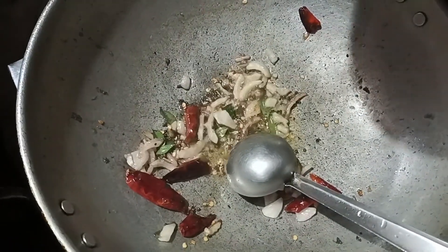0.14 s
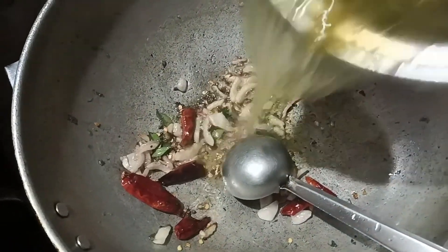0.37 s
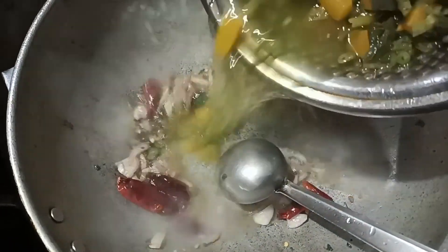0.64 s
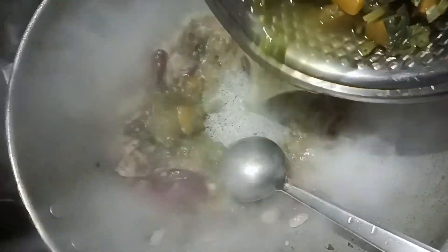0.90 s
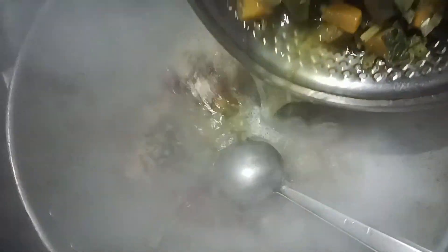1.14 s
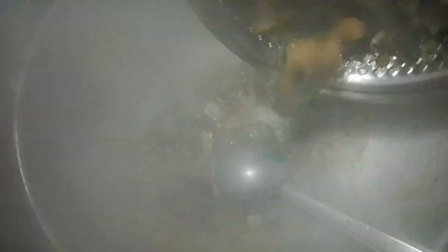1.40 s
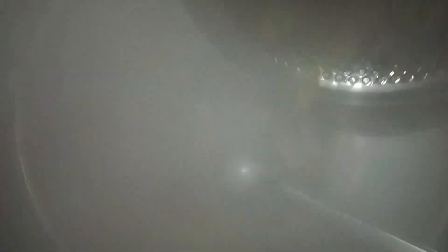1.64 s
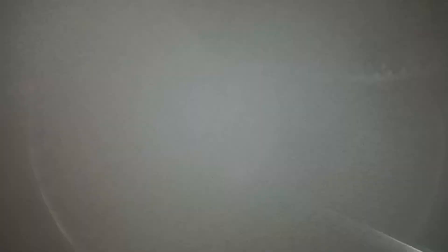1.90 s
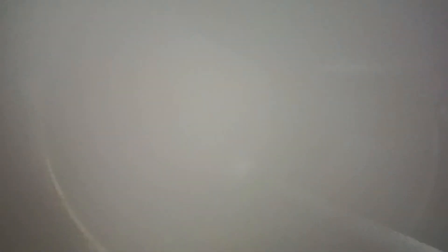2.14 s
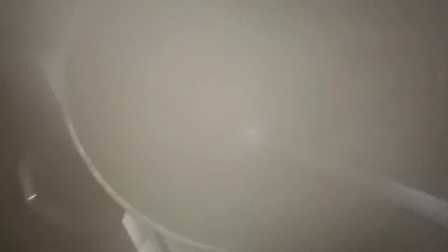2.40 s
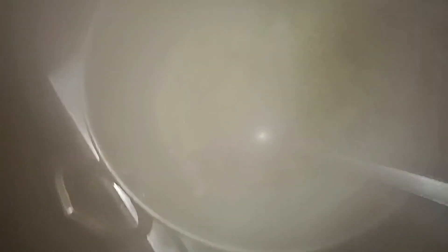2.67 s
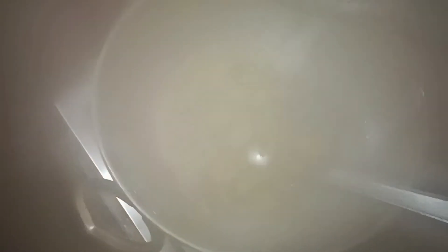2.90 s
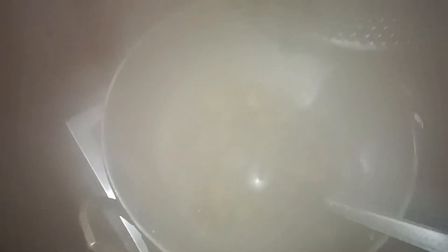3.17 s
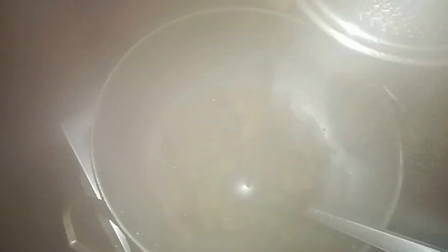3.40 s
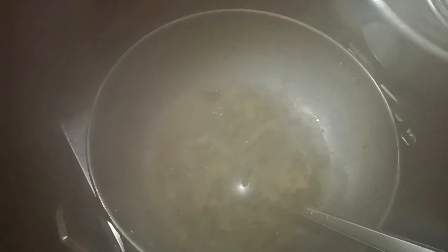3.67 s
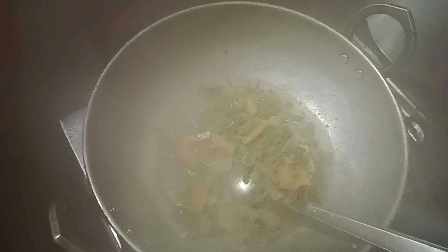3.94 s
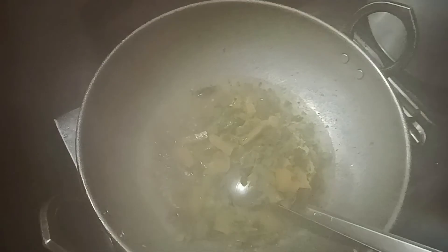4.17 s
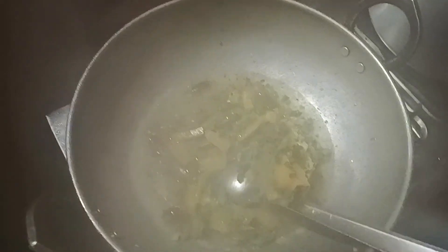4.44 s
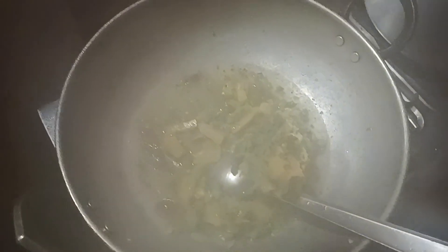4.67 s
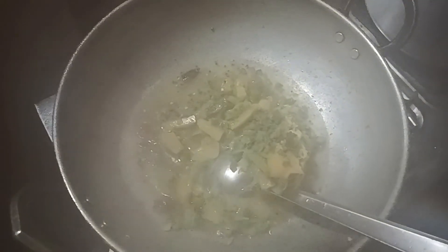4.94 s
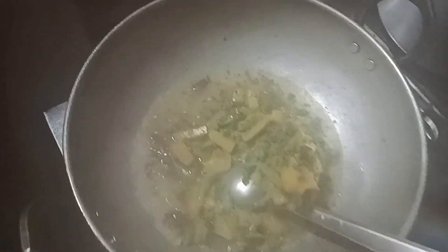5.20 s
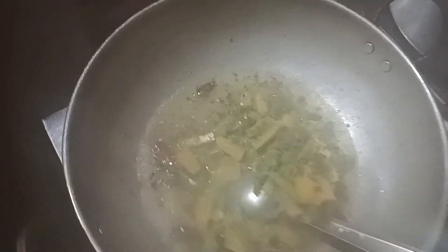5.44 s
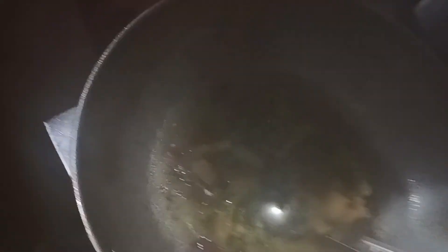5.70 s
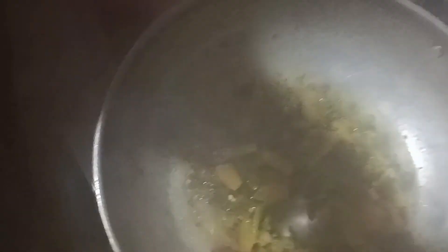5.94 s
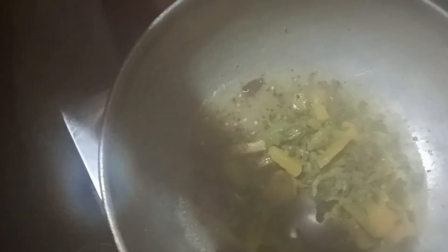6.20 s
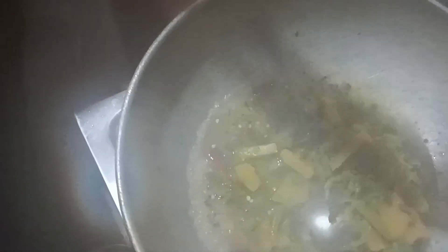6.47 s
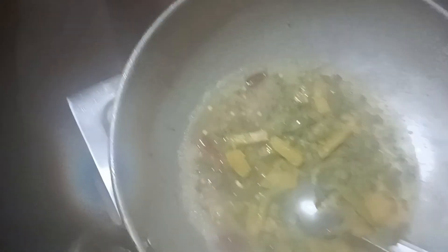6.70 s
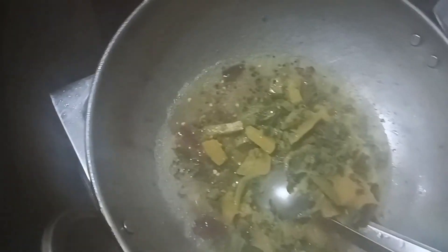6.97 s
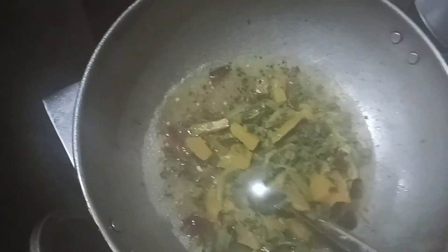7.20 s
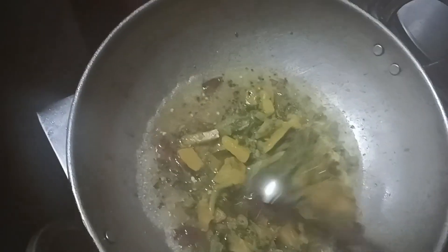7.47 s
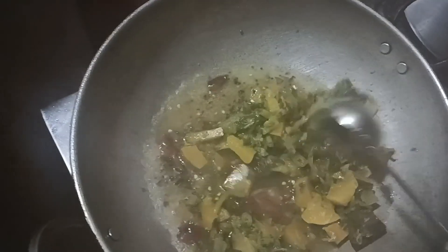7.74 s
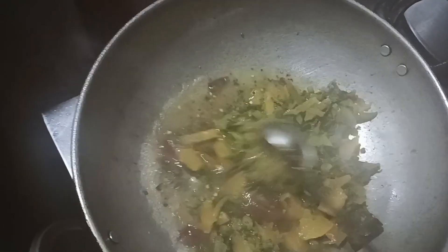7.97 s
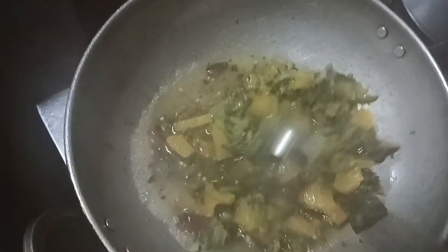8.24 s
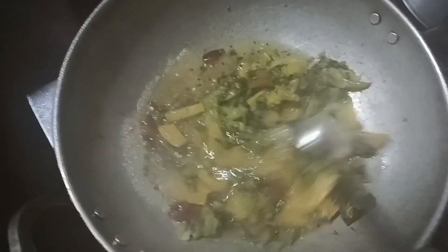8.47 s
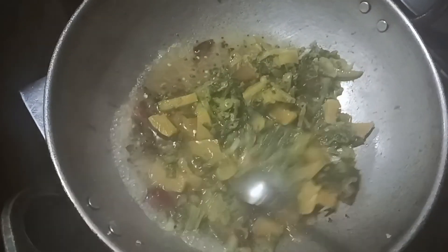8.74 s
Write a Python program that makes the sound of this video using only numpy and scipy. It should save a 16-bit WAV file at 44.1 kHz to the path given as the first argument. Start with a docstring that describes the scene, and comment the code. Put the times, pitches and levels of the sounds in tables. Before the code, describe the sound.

Liquid curry is poured into a hot oiled metal pan, erupting in a loud sizzle that fades to crackle before a bowl thuds and a ladle knocks.

```python
"""Curry poured into hot oil

Kitchen, wide metal pan: curry hits hot oil, steam bursts out and the sizzle cools to a thin crackle.
A bowl is set down on the counter, then a ladle scrapes and knocks in the pan; stirring wakes the sizzle.
Fizz is filtered noise and clicks, bubbles and metal are ringing modes, steam and gurgles are lumpy noise.
The microphone is a hand-held phone with two unlike ports; one oil drop hits the right one."""
import sys
import numpy as np
from scipy import signal
from scipy.fft import rfft, irfft, next_fast_len
from scipy.io import wavfile

SR = 44100
rng = np.random.default_rng(int(sys.argv[2]) if len(sys.argv) > 2 else 0)


def log_audio(samples):
    """Write samples as a 16-bit WAV file to the path given in sys.argv[1]."""
    # one column per channel
    frames = np.atleast_2d(samples).T
    # limit to full scale, then quantise
    limited = np.clip(frames, -1, 1)
    pcm = np.round(limited * 32767).astype(np.int16)
    wavfile.write(sys.argv[1], SR, pcm)


def convert_level_to_amplitude(level_db):
    """Map a level in decibels to its linear amplitude factor."""
    exponent = np.asarray(level_db, float) / 20
    return 10 ** exponent


N = 390726
SIZE = next_fast_len(N + SR)
HZ = np.maximum(np.arange(SIZE // 2 + 1) * SR / SIZE, 1)   # frequency of each spectrum bin

# Levels in the tables are relative unless noted.
# Fizz colour at each port: [f/Hz, left level/dB, right level/dB]
PORT_COLOURS = [(1500, -13, -47.5), (2330, -7, -6), (3110, -1.5, -0.5), (3840, -1.5, 3.5), (4420, -6, 0.5),
                (6790, -12.5, -7.5), (8060, -9.5, -0.5), (8760, -22.5, -1), (9160, -9.5, -13),
                (10010, 1, -15.5), (10780, 4, -13), (11170, -3, -22), (12400, -3, -11), (15000, -3, -13.5)]
# Likeness of the two ports: [f/Hz, share]
PORT_LIKENESS = [(60, 0.16), (300, 0.45), (750, 0.8), (1100, 0.12), (2200, 0.21), (5000, 0.1)]
# The hand turns the phone, which shifts the fizz sideways: [t/s, left-right level/dB]
PHONE_TURN = [(.25, -4), (2.6, -4), (3.2, 0.5), (4.6, -5), (7.0, -3.5), (8.2, -6.5)]
LEFT_LAG_S = 0.00017

KITCHEN_T60_S, KITCHEN_DB = 0.07, -2   # decay up to 400 Hz; echo gain

DROP_S, DROP_RISE_S, DROP_FALL_S = .45025, .0002, .0034
DROP_DB, PORT_VENT_HZ = -0.5, 109

# Bowl rocking on the counter: [t/s, level/dB]
BOWL_HITS = [(6.0245, -5), (6.031, -2.5), (6.049, -9), (6.064, -12), (6.082, -17), (6.1025, -8),
             (6.114, -20), (6.16, -25), (6.195, -29)]
# Bowl and counter modes: [f/Hz, level/dB, t60/s]
COUNTER_MODES = [(72, -10, 0.25), (107.1, 2.5, 0.25), (145, -3, 0.2), (190, 8, .015), (228, -9, 0.14),
                 (275, -8, 0.16), (340, -7, 0.16), (389, -2, 0.14), (644, -10, 0.12), (892, 7, 0.066),
                 (1640, -1, .02), (2380, -6, 0.025), (3690, -7, 0.012)]
# Rattle after each bowl hit: [f/Hz, level/dB, t60/s]
BOWL_RATTLE = [(90, -6.5, .54), (170, -10, 0.33), (485, -9, 0.22), (900, 3, 0.17), (1400, -4.5, 0.18),
               (2400, -15, 0.15), (3800, -16, 0.13)]
RATTLE_LUMPS_DB, RATTLES_PER_S = 3, 120

# Hollow notes of the pour, low gurgles and the air between bowl and pan:
# [t/s, length/s, level/dB, f/Hz, width of each of two resonances/Hz]
GURGLES = [(.9, 1.3, -47, 880, 70), (2.646, 0.12, -52.5, 214, 54), (2.62, .35, -46, 1800, 160),
           (2.91, 0.14, -58, 214, 54), (3.3, 1.0, -54, 1520, 120)]

# Ladle strokes along the pan:
# [t at the height/s, length/s, level/dB, most excited f/Hz, loss one octave away/dB]
LADLE_STROKES = [(6.949, 0.071, -57.5, 1400, 27), (6.967, 0.14, -58.5, 450, 25),
                 (7.218, 0.14, -42.5, 580, 34), (7.217, 0.09, -45, 1130, 30), (7.221, 0.022, -42, 1110, 8),
                 (7.268, 0.15, -56, 1040, 60), (8.052, 0.078, -62.5, 1590, 6),
                 (8.513, 0.059, -56.5, 1290, 35.5), (8.58, 0.1, -54, 1240, 60), (8.583, 0.1, -55, 650, 120),
                 (8.666, 0.13, -57, 2900, 1), (8.776, 0.18, -64, 700, 57), (8.797, .14, -66, 1500, 20)]
# Pan modes, damped by the curry: [f/Hz, level/dB, t60 when struck/s]
PAN_MODES = [(361, -14.5, 0.11), (470, -8.5, 0.1), (552.5, -6.5, 0.17), (642, -15, 0.11), (710, -10.5, 0.1),
             (826, -9, 0.068), (1069, -5, 0.11), (1215, 3.5, 0.022), (1345, -7, 0.071), (1493, -1.5, 0.046),
             (1730, 2, 0.063), (1980, 8, 0.06), (2310, 2, 0.09), (2710, 3, 0.061), (3070, 15, 0.1)]
# Rattle and splash after the knock: [f/Hz, level/dB, t60/s]
KNOCK_SPLASH = [(202, 8.5, 0.24), (560, 11.5, 0.23), (1400, 9.5, 0.29), (2600, 12.5, 0.41),
                (3870, -2, 0.13)]
KNOCK_S, KNOCK_DB, SPLASH_DB, CRACK_DB = 8.648, -13.5, -22, -17   # time; relative levels
KNOCK_EVENS = 0.31   # a hard blow keeps this share of the level steps between modes
KNOCK_SCATTER_DB = 2.5
RISE_SHARE = 0.4   # part of a stroke that swells
DRAG_DAMPS = .7   # share of the t60 left while the ladle rests on the metal
LADLE_CENTRED_S = 8.3   # from here the ladle is equally far from both ports

# Steam rush colour: [f/Hz, level/dB per Hz]
STEAM_COLOUR = [(25, -38.5), (50, -17.5), (90, -7), (200, -4.5), (600, -4.5), (1150, 1), (1400, -33)]
# Steam rises while curry is poured, large bubbles go as the pan cools:
# [t/s, steam level/dB, lowest bubble f/Hz]
POUR = [(.232, -80, 1310), (.27, -44, 610), (.34, -41, 900), (.85, -41, 640), (1.8, -44, 640),
        (2.3, -44.5, 580), (2.42, -47.5, 616), (2.5, -49.5, 764), (2.66, -59, 630), (2.8, -45.5, 655),
        (2.95, -62.5, 665), (3.08, -64.5, 900), (3.3, -69.5, 1060), (3.9, -70, 1435), (5.3, -75, 1342),
        (8.86, -79, 1234)]
STEAM_FEELS_LULL = 1   # dB per dB

# Bubble strength by pitch: [f/Hz, level/dB]
BUBBLE_COLOUR = [(500, -18), (730, -8), (875, -7), (1025, -20.5), (1110, 3), (1290, 0), (1460, 1.5),
                 (1700, 2), (1920, -1), (2150, 1.5), (2600, -2)]
FULL_DB = -25   # fizz level of the full sizzle
BUBBLES_DB, BUBBLES_FOLLOW = -49, 1.318   # relative, at a fizz of FULL_DB; dB per dB of fizz
COMMON_HZ, COMMON_FOLLOWS = 1043, 0.36   # commonest pitch = this + share of the lowest pitch
# The last slop hits bare metal: more and smaller bubbles
SURGE_S, SURGE_LENGTH_S, SURGE_DB, SURGE_HZ = 2.6, 0.97, 2, 1810

# Vigour of the sizzle; stirring wakes it again near the end: [t/s, fizz level/dB]
HEAT = [(0, -48.5), (.232, -49.5), (.25, -28), (.31, -22.5), (.76, -25), (1.8, -25), (2.95, -26),
        (3.5, -30), (4.3, -36), (4.8, -41), (5.4, -43), (6.05, -43.5), (7.93, -49), (8.0, -46.5),
        (8.47, -46.5), (8.65, -39), (8.71, -42), (8.86, -41.5)]
# The sizzle dips briefly while the curry slops in: [t/s, depth in the fizz/dB, half length/s]
LULLS = [(1.302, 1.5, 0.1), (1.521, 4, 0.062), (1.605, 4, 0.036), (1.977, 2, 0.16), (2.186, 7, 0.068),
         (2.261, 4, 0.019), (2.358, 5.5, 0.06), (2.51, 4.5, 0.13)]
# Single oil spits: [t/s, level/dB]
OIL_SPITS = [(4.351, -27), (5.013, -28), (5.062, -27), (5.501, -31), (6.636, -29), (6.686, -20),
             (6.824, -31)]
# The fizz flickers separately between these pitches: [f/Hz]
FIZZ_SPLITS_HZ = (3150, 6500, 9400)
LOW_FIZZ_THINS = 0.23   # below 3150 Hz one hears the quieter fizz thinned further: dB per dB

BASS_CUT_HZ, TOP_HZ = 34, 15850
LIMIT_DB, RELEASE_DB_PER_S = -9.5, 147.5


def rms_one(x):
    """Scales to unit rms."""
    return x / np.sqrt(np.mean(x ** 2) + 1e-20)


def in_time(rows):
    """Table columns as curves over all samples."""
    s, *columns = np.transpose(rows)
    return [np.interp(np.arange(N) / SR, s, c) for c in columns]


def at_hz(points, hz, axis=1):
    """A spectrum column read on a log-frequency axis."""
    points = np.array(points)
    return np.interp(np.log(hz), np.log(points[:, 0]), points[:, axis])


def high_pass(x, order, hz):
    """Butterworth bass cut."""
    return signal.sosfilt(signal.butter(order, hz, "high", fs=SR, output="sos"), x)


def drift(rate):
    """Slow chance of spread 1: noise through two poles at rate Hz, drawn every 40 samples."""
    r = np.exp(-80 * np.pi * rate / SR)
    noise = rng.standard_normal(N // 40 + 2002)
    slow = signal.lfilter([1], [1, -2 * r, r * r], noise)[2000:]
    return np.interp(np.arange(N) / 40, np.arange(len(slow)), rms_one(slow))


def ring(force, hz, t60):
    """A damped resonator: a unit click sets a sine of height 1 ringing."""
    r, w = convert_level_to_amplitude(-60 / (t60 * SR)), 2 * np.pi * hz / SR
    return signal.lfilter([0, np.sin(w)], [1, -2 * r * np.cos(w), r * r], force + 1e-18)


def clicks(per_s, spread_db):
    """Random clicks of uneven size; two rows with the same timing and unrelated signs."""
    sizes = convert_level_to_amplitude(spread_db * np.minimum(rng.exponential(1, N), 3.2))
    sizes = sizes * (rng.random(N) < per_s / SR)
    return rms_one(sizes * rng.choice([-1, 1], (2, N)))


def strike(hits, modes, scatter_db):
    """Every hit gives each mode its own strength; all start in step, which makes the sharp edge."""
    at, hit_db = [round(s * SR) for s, db in hits], np.array(hits)[:, 1]
    out = np.zeros(N)
    chance = rng.standard_normal((len(hits), len(modes)))
    for k, (hz, db, t60) in enumerate(modes):
        force = np.zeros(N)
        force[at] = -convert_level_to_amplitude(hit_db + db - 21 + scatter_db * chance[:, k])
        out += ring(force, hz, t60)
    return out


def rattle(hits, bands):
    """Dense noise after each hit, dying band by band."""
    out, kicks = np.zeros(N), np.zeros(N)
    kicks[[round(s * SR) for s, db in hits]] = convert_level_to_amplitude(np.array(hits)[:, 1])
    lumps = convert_level_to_amplitude(RATTLE_LUMPS_DB * drift(RATTLES_PER_S) - 1)   # quick uneven touches, alike in all bands
    for hz, db, t60 in bands:
        dying = signal.lfilter([1], [1, -convert_level_to_amplitude(-60 / (t60 * SR))], kicks + 1e-18)
        band = signal.butter(2, [hz / 1.6, hz * 1.6], "band", fs=SR, output="sos")
        noise = rms_one(signal.sosfilt(band, rng.standard_normal(N)))
        out += noise * dying * convert_level_to_amplitude(db - 22.5)
    return out * lumps


def to_ports(pair, gains=1):
    """A shared part, late on the left, and an opposed part, mixed by likeness, then coloured."""
    shared, opposed = rfft(pair, SIZE)
    alike = np.clip(at_hz(PORT_LIKENESS, HZ), 0, 1)
    both = np.sqrt(1 + alike) * shared + np.sqrt(1 - alike) * opposed * [[1], [-1]]
    # the bass wraps round the phone in step
    late = np.exp(-2j * np.pi * np.maximum(HZ - 600, 0) * LEFT_LAG_S)
    return irfft(both * gains * [late, np.ones(len(HZ))], SIZE)[:, :N]


def placed(x, lag_s, pan_db):
    """A point source: lag_s later on the left, pan_db the left-right level."""
    left = np.interp(np.arange(N) - lag_s * SR, np.arange(N), x)
    return np.array([left * convert_level_to_amplitude(pan_db / 2), x * convert_level_to_amplitude(-pan_db / 2)])


def kitchen(x):
    """Room echo: eight feedback delays a side, duller towards the treble."""
    t60 = KITCHEN_T60_S * np.minimum(1, (400 / HZ) ** 0.072)
    echo = np.zeros((2, len(HZ)), complex)
    for k, lag in enumerate(rng.uniform(.011, .037, 16)):   # seconds
        loop = convert_level_to_amplitude(-60 * lag / t60) * np.exp(-2j * np.pi * HZ * lag)
        echo[k % 2] += (-1) ** (k // 2) * loop / (1 - loop)
    return irfft(rfft(x, SIZE) * echo, SIZE)[:, :N] / np.sqrt(8)


def oil_drop():
    """A drop on the right port shoves the membrane; the vent lets it swing back."""
    t = np.arange(N) / SR - DROP_S
    shove = -convert_level_to_amplitude(DROP_DB) * np.exp(-np.abs(t) / DROP_FALL_S) * np.clip(t / DROP_RISE_S, 0, 1)
    return high_pass(shove, 2, PORT_VENT_HZ) * [[0], [1]]


def bowl():
    """Bowl on the counter: low modes, and a dense rattle that dies faster in the treble."""
    thud = strike(BOWL_HITS, COUNTER_MODES, scatter_db=3.0) + rattle(BOWL_HITS, BOWL_RATTLE)
    return high_pass(thud, 7, 66)   # nothing under the lowest mode


def gurgles():
    """Lumpy noise in one resonance, held while a slop lasts and cut off when it ends."""
    t, out = np.arange(N) / SR, 0
    for s, length, db, hz, width_hz in GURGLES:
        held = convert_level_to_amplitude(db) * np.clip(np.minimum((t - s) / 0.022, (s + length - t) / .012), 0, 1)
        t60 = np.log(1000) / (np.pi * width_hz)
        lumpy = rng.standard_normal(N) * convert_level_to_amplitude(1.8 * drift(30) + 2.5 * drift(6))
        out = out + held * rms_one(ring(ring(lumpy, hz, t60), hz, t60))
    return out


def ladle_knock():
    """One hard blow strikes all the pan's modes; rattle and splash follow."""
    struck = [(hz, KNOCK_EVENS * db, t60) for hz, db, t60 in PAN_MODES]
    blow = strike([(KNOCK_S, KNOCK_DB)], struck, scatter_db=KNOCK_SCATTER_DB)
    return blow + rattle([(KNOCK_S, SPLASH_DB)], KNOCK_SPLASH)


def ladle_scrape():
    """Dragging through the curry is a dense soft friction that feeds the pan's modes."""
    t, out, swells = np.arange(N) / SR, np.zeros(N), []
    for s, length, *colour in LADLE_STROKES:
        rise = 1 + (t - s) / (RISE_SHARE * length)
        fall = 1 - (t - s) / ((1 - RISE_SHARE) * length)
        swells.append(np.clip(np.minimum(rise, fall), 0, 1))
    slips = clicks(per_s=3100.0, spread_db=4.0)
    stroke_db, centre_hz, off_db = np.transpose(LADLE_STROKES)[2:]
    for k, (hz, db, t60) in enumerate(PAN_MODES):
        contact = rms_one(ring(slips[k % 2], hz, 0.04))   # soft contact narrows each slip
        force = convert_level_to_amplitude(stroke_db - off_db * np.log2(hz / centre_hz) ** 2) @ np.array(swells)
        gain = convert_level_to_amplitude(db - 58.5) / np.sqrt(t60) / np.sqrt(np.sin(2 * np.pi * hz / SR))
        out += ring(contact * force, hz, DRAG_DAMPS * t60) * gain
    return out


def ladle():
    """Knock and scrapes in the pan, which is too small for bass."""
    return high_pass(ladle_knock() + ladle_scrape(), 4, 170)


def steam_rush(level_db):
    """Rising steam buffets the ports: lumpy low noise."""
    lumps = convert_level_to_amplitude([2.0 * drift(53), 2.0 * drift(4.9)])
    low = to_ports(rng.standard_normal((2, N)) * lumps, convert_level_to_amplitude(at_hz(STEAM_COLOUR, HZ)))
    return low / np.std(low.mean(axis=0)) * convert_level_to_amplitude(level_db + 2.5)


def bubbles(level_db, lowest_hz, common_hz, cycles=27.0, edge_db=67.0, crowd_db=3.0, patchy_db=1.9):
    """Bubbles ring some cycles each, crowd round one size; pitches under the lowest die out steeply."""
    out = np.zeros((2, N))
    calm = np.clip((-26 - level_db) / 25, 0, 1.5)   # more alike when calm
    for hz in np.geomspace(480, 2700, 24):
        under = np.minimum(np.log2(hz / lowest_hz), 0)   # octaves
        crowd = calm * np.exp(-(np.log2(hz / common_hz) / .16) ** 2)
        colour_db = at_hz(BUBBLE_COLOUR, hz)
        gain = convert_level_to_amplitude(colour_db + edge_db * under + crowd_db * crowd + patchy_db * drift(4.2))
        born = rng.standard_normal((2, N)) * (rng.random((2, N)) < 500 / SR)   # 500 per second
        out += rms_one(ring(ring(born, hz, cycles / hz), hz, cycles / hz)) * gain
    return to_ports(out) * convert_level_to_amplitude(level_db)


def vigour():
    """Fizz level with its dips, and the dips alone, in dB."""
    t, (heat_db,) = np.arange(N) / SR, in_time(HEAT)
    dip_db = sum(depth_db * np.clip(1 - np.abs(t - s) / half, 0, 1) for s, depth_db, half in LULLS)
    return heat_db - dip_db, dip_db


def spits(colour):
    """Oil spits and the crack of the knock: one sharp click each, shaped by the ports."""
    single = np.zeros((2, N))
    for s, db in OIL_SPITS + [(KNOCK_S, CRACK_DB)]:
        single[0, round(s * SR)] = convert_level_to_amplitude(db)
    return to_ports(single, colour / np.mean(colour[:, HZ < TOP_HZ]) * convert_level_to_amplitude(10.5))


def fizz(level_db):
    """Tiny steam bursts merge into hiss; sparser spits crackle through it, more so as it quietens."""
    colour = convert_level_to_amplitude([at_hz(PORT_COLOURS, HZ, axis=1), at_hz(PORT_COLOURS, HZ, axis=2)])
    colour = colour * np.minimum(HZ / 1500, 1) ** 3
    share = np.clip(.15 - 0.01 * (level_db + 18.5), 0, .9)
    crackle = rms_one(signal.lfilter([1, -.9], [1], clicks(per_s=700, spread_db=8.5)))
    bursts = np.sqrt(1 - share ** 2) * rng.standard_normal((2, N)) + share * crackle
    flicker_db = 0.4 * drift(9.0) + 0.67 * drift(43.2)
    spectrum = rfft(to_ports(bursts * convert_level_to_amplitude(flicker_db), colour), SIZE)
    part = np.searchsorted(FIZZ_SPLITS_HZ, HZ)
    own_db = [0.53 * drift(3.8) + .5 * drift(30) for k in range(4)]
    own_db[0] += LOW_FIZZ_THINS * (level_db - FULL_DB)
    sound = sum(irfft(spectrum * (part == k), SIZE)[:, :N] * convert_level_to_amplitude(db) for k, db in enumerate(own_db))
    return sound / np.std(sound.mean(axis=0)) * convert_level_to_amplitude(level_db) + spits(colour)


def scene():
    """All sources at the two ports."""
    fizz_db, dip_db = vigour()
    steam_db, lowest_hz = in_time(POUR)
    surge_end_s = SURGE_S + SURGE_LENGTH_S
    surge, = in_time([(SURGE_S - .05, 0), (SURGE_S, 1), (SURGE_S + SURGE_LENGTH_S / 2, 1), (surge_end_s, 0)])
    bubble_db = BUBBLES_DB + BUBBLES_FOLLOW * (fizz_db - FULL_DB) + SURGE_DB * surge
    common_hz = (1 - surge) * (COMMON_HZ + COMMON_FOLLOWS * lowest_hz) + surge * SURGE_HZ
    turn_db, = in_time(PHONE_TURN)

    thud = bowl()
    in_pan = ladle() + gurgles() * convert_level_to_amplitude(-dip_db)
    pan_lag_s = LEFT_LAG_S * (np.arange(N) < LADLE_CENTRED_S * SR)
    solid = placed(thud, 0.00035, pan_db=-3.0) + placed(in_pan, pan_lag_s, pan_db=-3.5)
    echo = convert_level_to_amplitude(KITCHEN_DB) * kitchen(thud + in_pan)

    steam = steam_rush(steam_db - STEAM_FEELS_LULL * dip_db)
    boil = bubbles(bubble_db, lowest_hz, common_hz)
    hiss = fizz(fizz_db) * convert_level_to_amplitude([turn_db / 2, -turn_db / 2])
    return echo + oil_drop() + solid + steam + boil + hiss


def band_limit(x):
    """A steep low-pass at the top of the band."""
    return signal.sosfilt(signal.butter(12, 17040, fs=SR, output="sos"), x)


def record(dry):
    """Bass and top are cut; a limiter ducks both channels after peaks and recovers at a steady rate."""
    dry = high_pass(dry, 2, BASS_CUT_HZ)
    dry = signal.sosfilt(signal.ellip(12, .3, 60, TOP_HZ, fs=SR, output="sos"), dry)
    over_db = np.maximum(20 * np.log10(np.abs(dry).max(axis=0) + 1e-9) - LIMIT_DB, 0)
    ramp_db = RELEASE_DB_PER_S * np.arange(N) / SR
    held_db = np.maximum.accumulate(over_db + ramp_db) - ramp_db
    duck_db = signal.lfilter([.02], [1, -.98], held_db)   # smoothed over about 50 samples
    return band_limit(dry * convert_level_to_amplitude(-duck_db))


dry = scene()
out = record(dry)
log_audio(out)
```